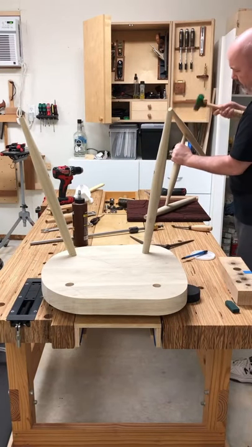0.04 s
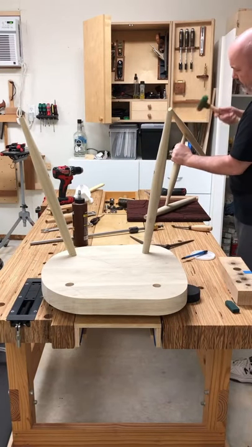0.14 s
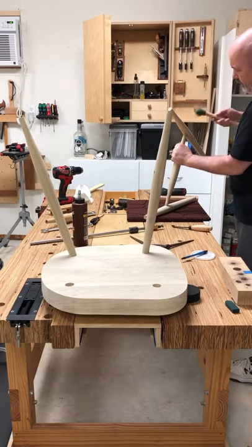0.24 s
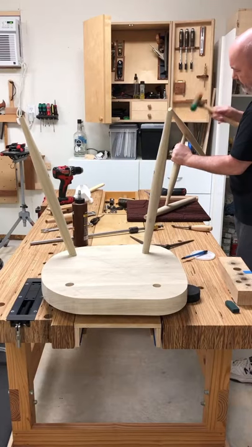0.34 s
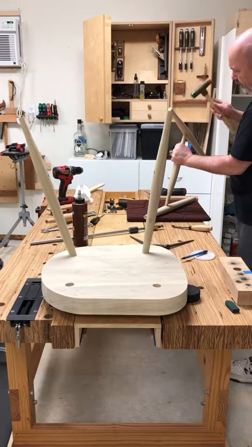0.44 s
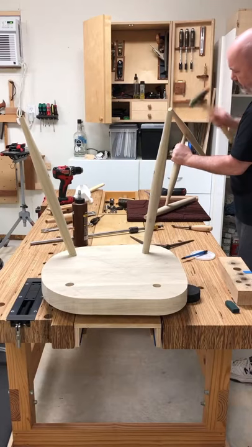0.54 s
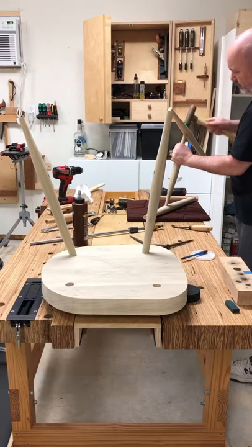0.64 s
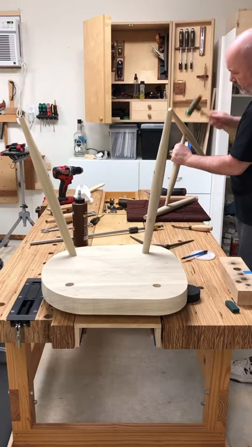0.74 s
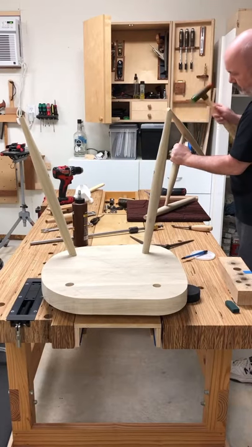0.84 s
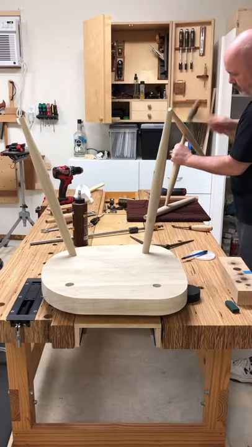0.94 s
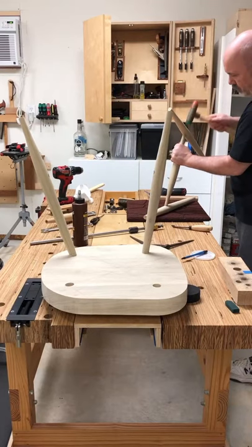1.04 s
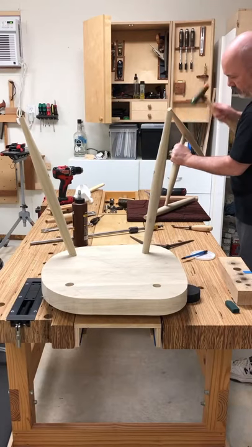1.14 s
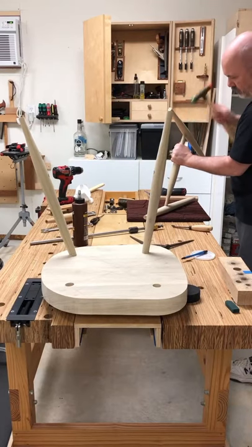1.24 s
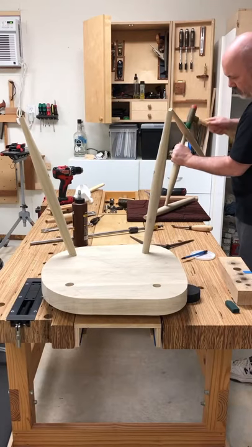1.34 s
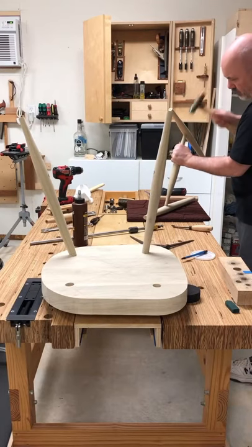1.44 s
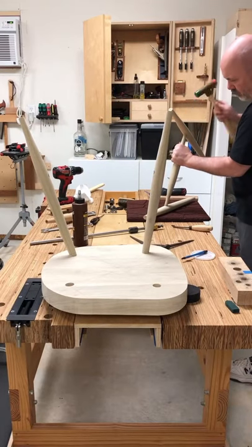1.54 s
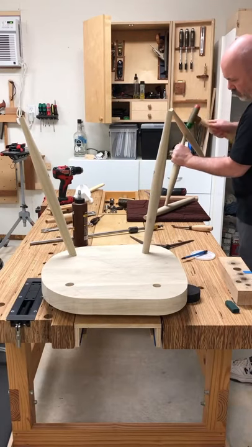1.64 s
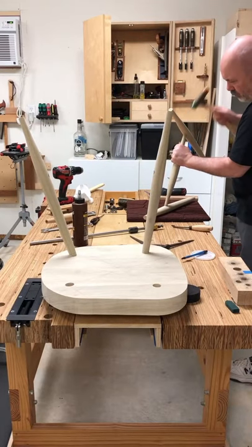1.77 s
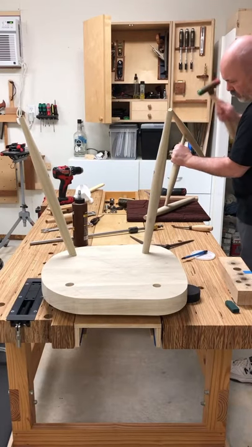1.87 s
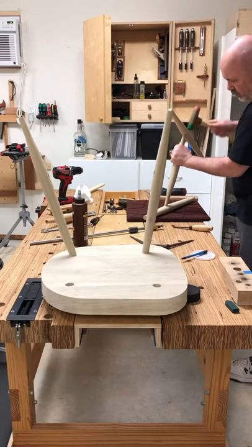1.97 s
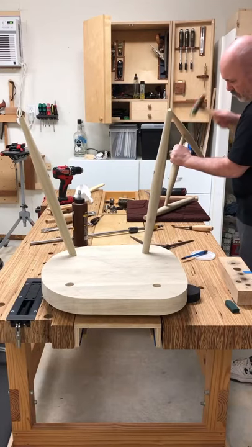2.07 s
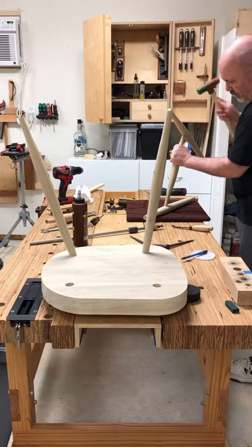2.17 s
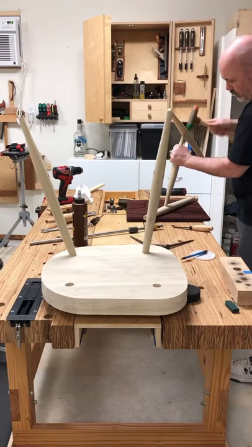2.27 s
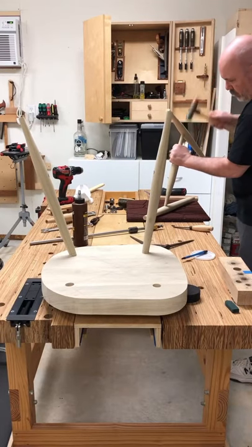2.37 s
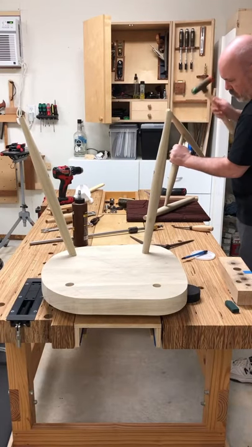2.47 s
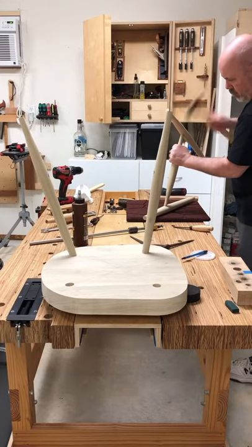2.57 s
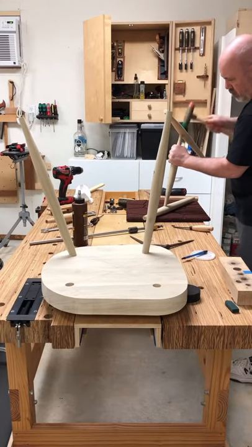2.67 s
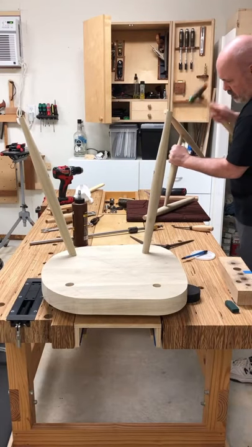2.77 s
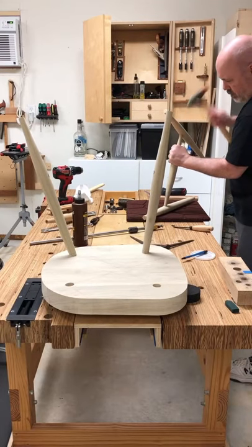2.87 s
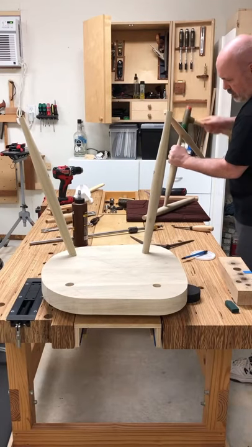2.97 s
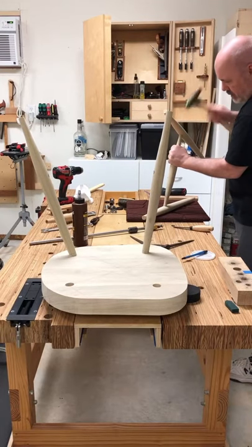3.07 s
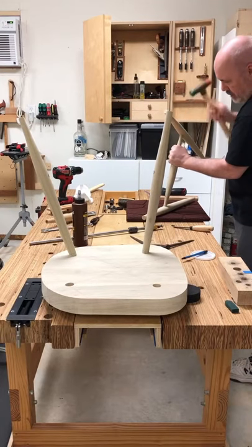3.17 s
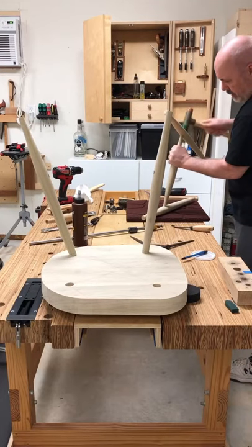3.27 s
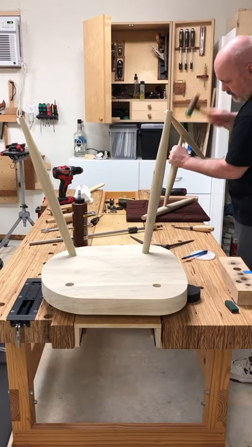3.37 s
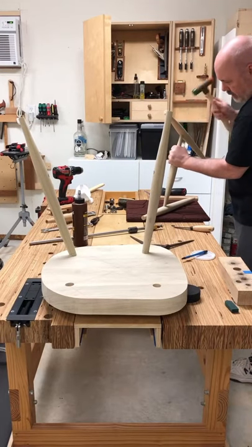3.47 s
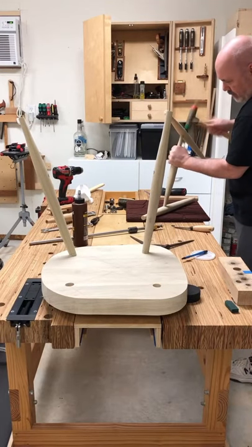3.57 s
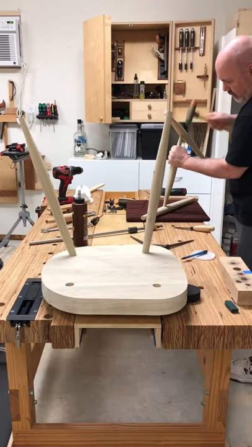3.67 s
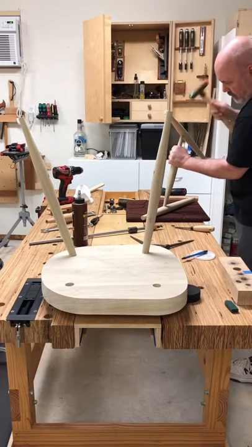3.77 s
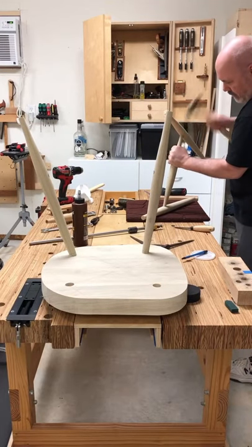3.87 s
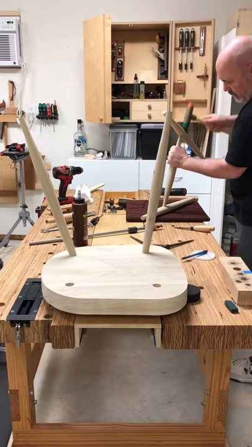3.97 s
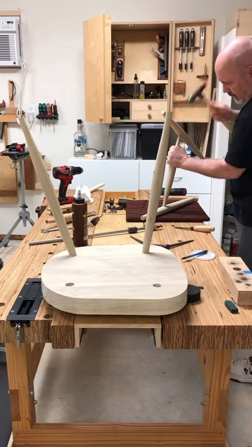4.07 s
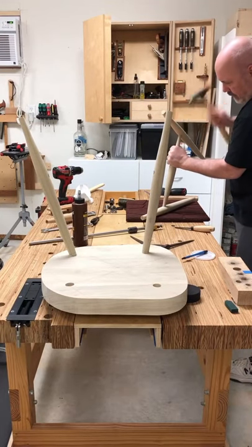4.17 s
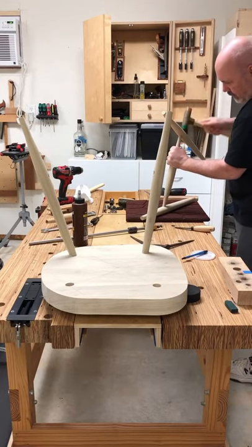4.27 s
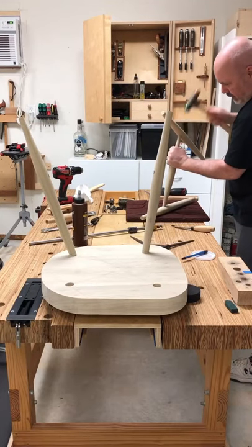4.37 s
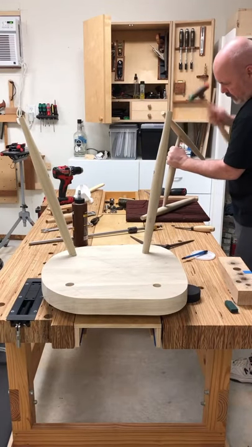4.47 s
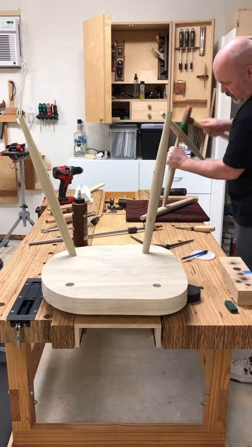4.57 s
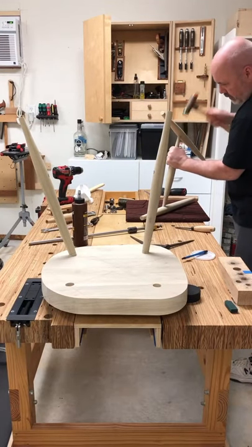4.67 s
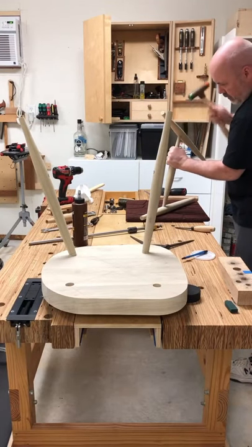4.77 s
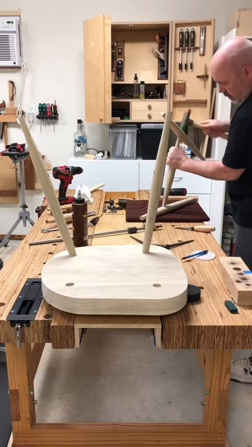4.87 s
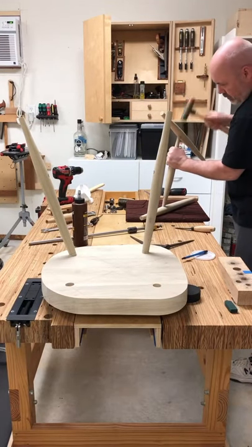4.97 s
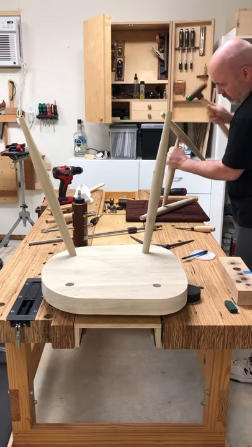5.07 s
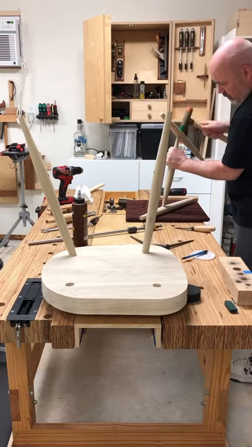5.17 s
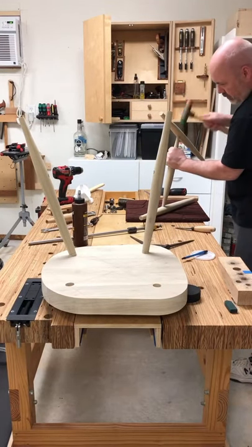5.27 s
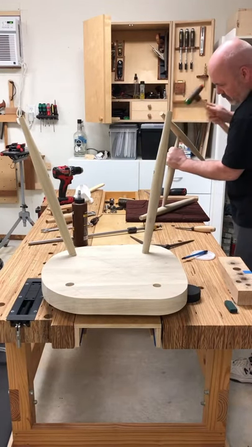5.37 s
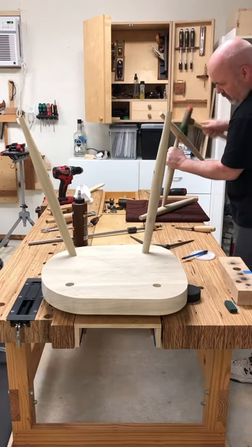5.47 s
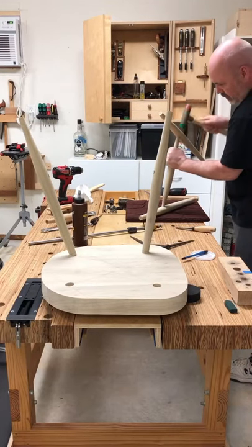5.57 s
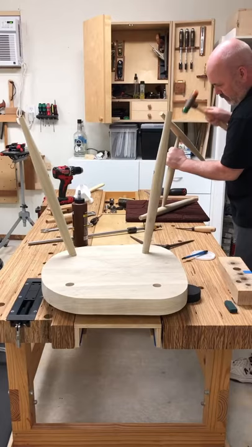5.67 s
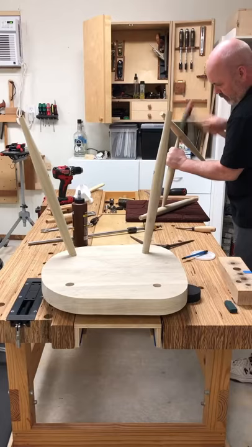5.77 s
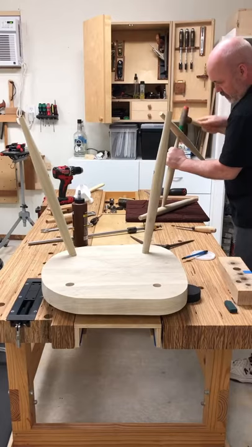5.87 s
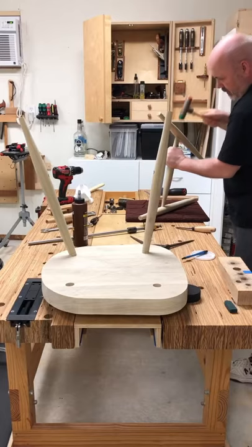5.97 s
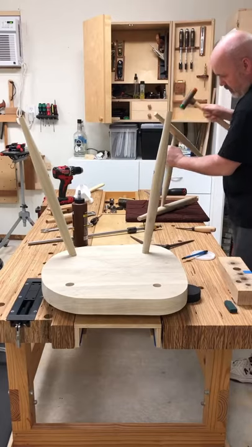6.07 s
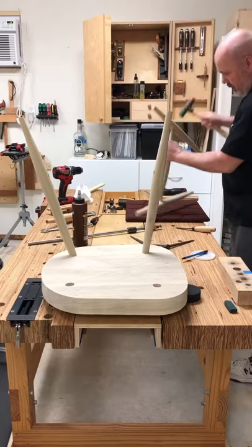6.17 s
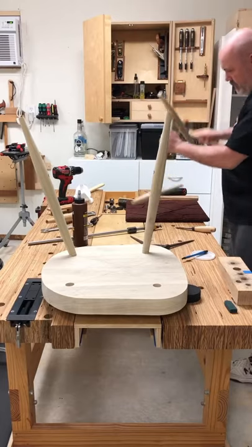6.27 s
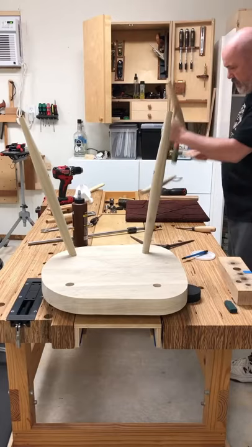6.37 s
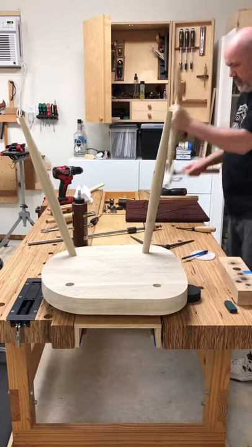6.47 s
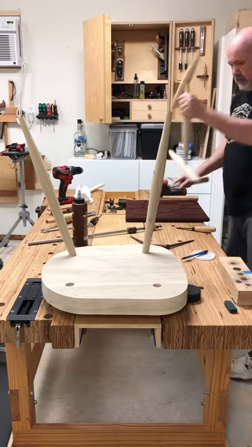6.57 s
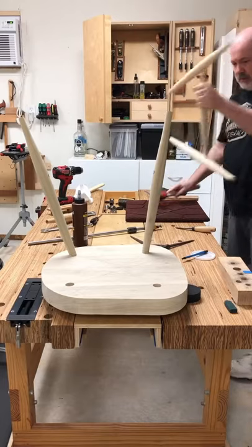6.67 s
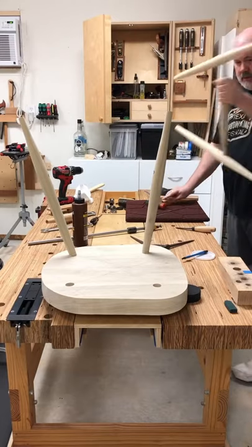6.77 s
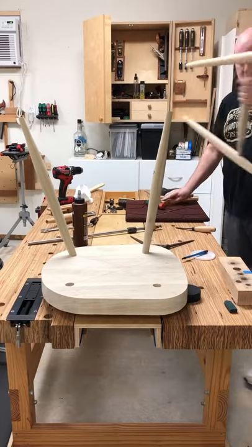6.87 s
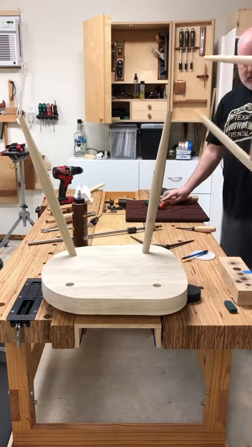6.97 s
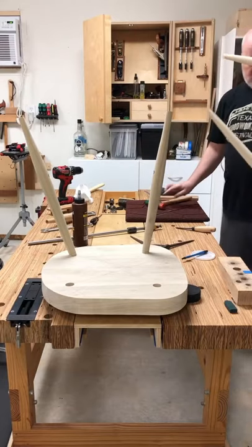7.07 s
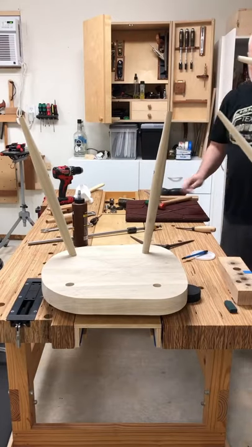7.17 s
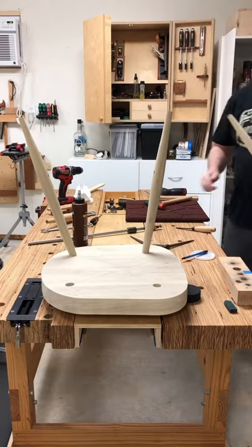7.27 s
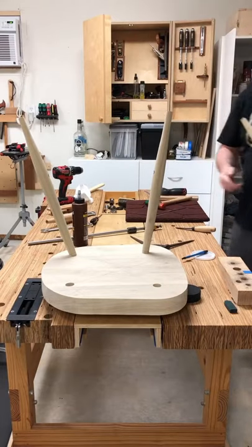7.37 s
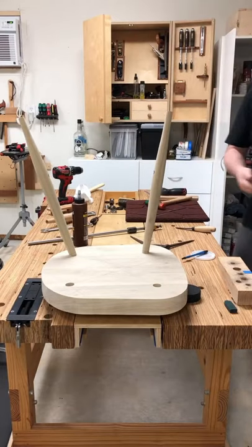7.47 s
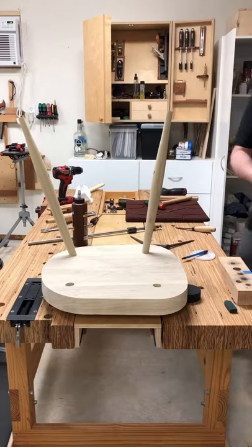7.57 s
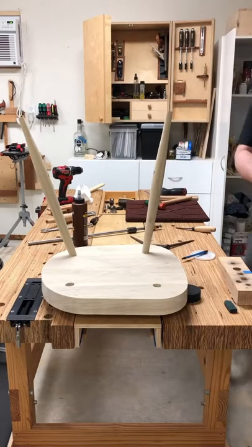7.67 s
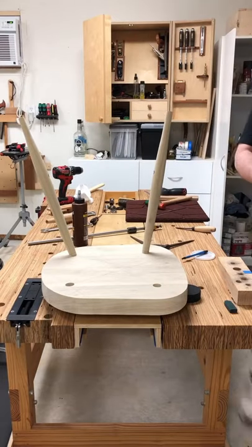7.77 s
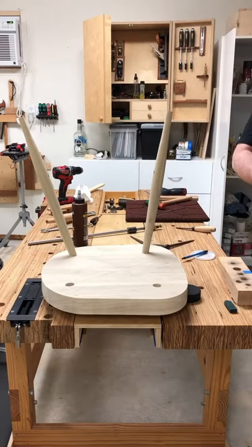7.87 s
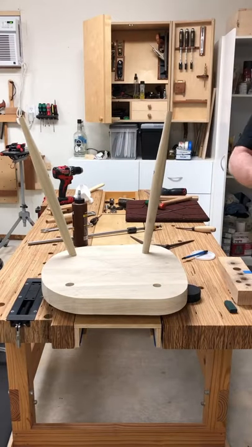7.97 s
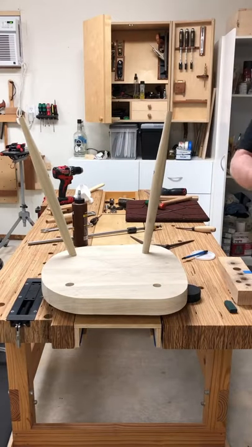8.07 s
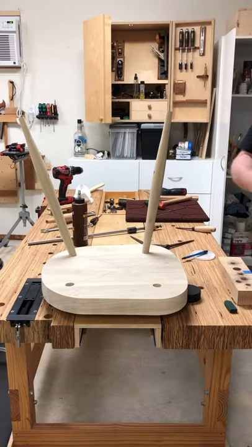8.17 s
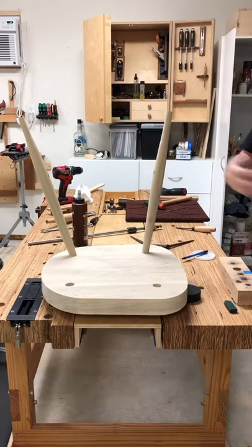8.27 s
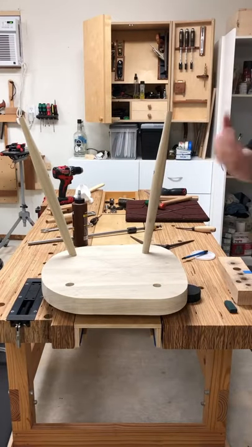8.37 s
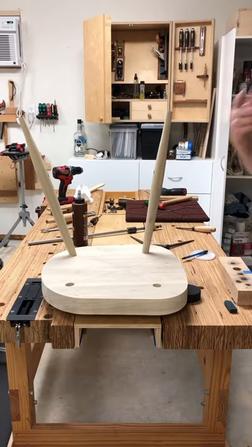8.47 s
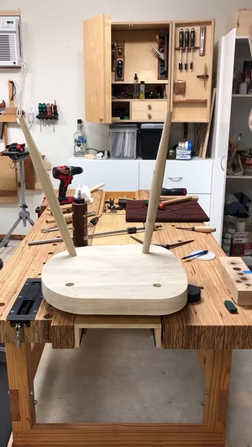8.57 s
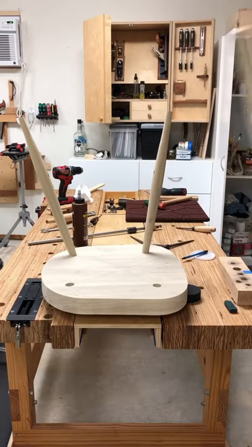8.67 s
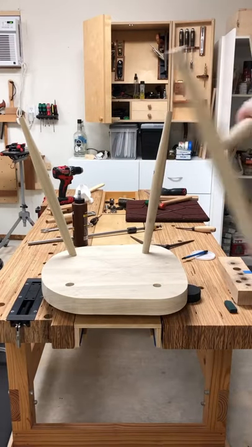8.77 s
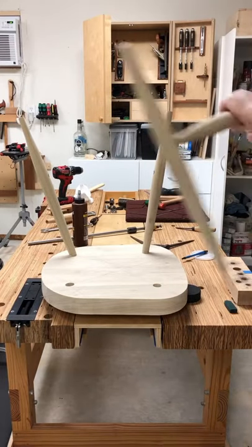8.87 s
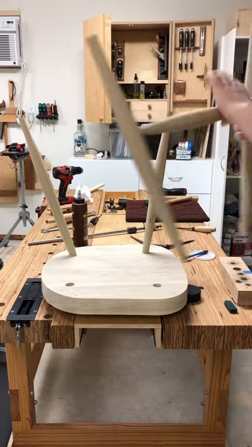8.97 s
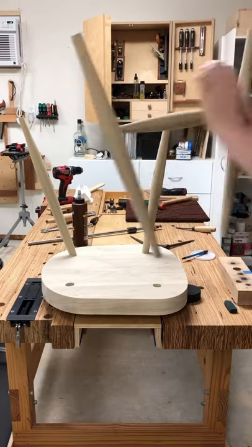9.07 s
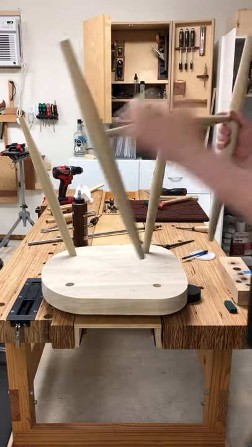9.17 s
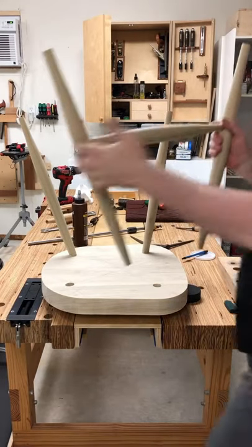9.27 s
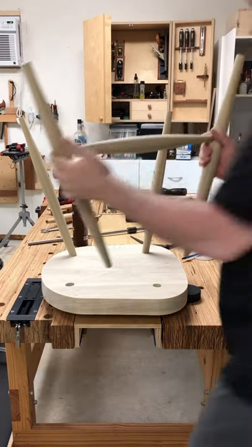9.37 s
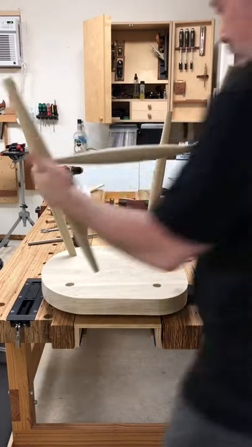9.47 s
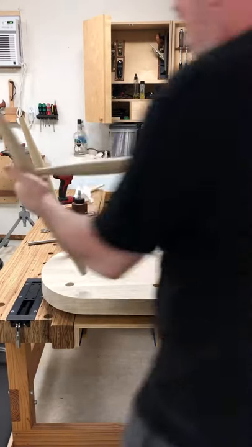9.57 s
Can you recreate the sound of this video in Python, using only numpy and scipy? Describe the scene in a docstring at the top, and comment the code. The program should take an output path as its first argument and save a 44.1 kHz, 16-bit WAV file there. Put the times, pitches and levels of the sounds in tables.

```python
"""An air conditioner hums; then a soft mallet drives a stretcher into the leg of an upside-down wooden chair.
Each blow slaps, rings the chair and booms through the bench: noise bursts, decaying sines and heavy swings.
The joint buzzes in the rebound and loose steel tools jump, as scattered touches set off clicks and ringing.
Then the worker steps away and brings the next frame over: a thump, wooden bumps and grainy noise slides.
Noise tails that die at a different speed in each octave give the reverberation of the small shop."""
import sys
import numpy as np
from scipy import signal
from scipy.fft import rfft, irfft, next_fast_len
from scipy.io import wavfile
from scipy.ndimage import uniform_filter1d

SR = 44100
rng = np.random.default_rng(int(sys.argv[2]) if len(sys.argv) > 2 else 0)


def dump(signal):
    """Clip the signal to [-1, 1] and save it as 16-bit WAV at the path in sys.argv[1]."""
    limited = np.clip(np.atleast_2d(signal).T, -1, 1)
    pcm = np.round(limited * 32767).astype(np.int16)
    wavfile.write(sys.argv[1], SR, pcm)


N = 425124
AGE = np.arange(int(0.8 * SR)) / SR  # seconds since the start of one short sound

# mallet blows: start_s [s], force_db [dB re a usual blow], hardness_db of the contact [dB],
# buzz_db of the joint in the rebound [dB]
BLOWS = [(0.6767, -2, -7, -8), (1.0334, -0.37, -11.5, 2.5), (1.3769, -1, -1, -13), (1.704, 0, 3.5, 4),
         (2.0257, 0, -1.5, -6), (2.3479, -0.5, -1.5, 7), (2.6703, -3.2, 6.5, -4), (2.9957, 0, 5, -7),
         (3.3229, 1.1, 2.5, 10.5), (3.6561, 0.8, -2, 9), (3.9729, 1.1, 0, -8), (4.2996, -0.66, 5, -3),
         (4.6122, 0.5, -1.5, 5), (4.924, -0.3, 3, 0), (5.2393, 0.56, 1.5, -4), (5.551, 0.14, -4, 5),
         (5.864, 0.3, -2.5, 2.5)]


def from_db(db):
    """Decibels to amplitude gain."""
    return 10 ** (np.asarray(db) / 20)


def rms_one(x):
    """Scale to rms 1."""
    return x / np.sqrt(np.mean(x ** 2) + 1e-20)


def at_hz(points, hz):
    """Read a (Hz, value) table on a log-frequency axis."""
    table = np.array(points)
    return np.interp(np.log(np.maximum(hz, 1)), np.log(table[:, 0]), table[:, 1])


def add(track, start_s, sound):
    """Mix a sound into a track at a time."""
    start = int(round(start_s * SR))
    track[start:start + len(sound)] += sound[:N - start]


def fade(t60):
    """Exponential decay that falls 60 dB in t60 seconds."""
    return from_db(-60 * AGE / t60)


def build_up(time_s):
    """Exponential approach to 1, as energy spreads through a body or room."""
    return 1 - np.exp(-AGE / time_s)


def swell(peak_s):
    """A soft rise and fall, height 1."""
    return (AGE / peak_s * np.exp(1 - AGE / peak_s)) ** 2


def high_pass(x, order, hz):
    """Causal low cut."""
    return signal.sosfilt(signal.butter(order, hz, "high", fs=SR, output="sos"), x)


def band(x, low_hz, high_hz):
    """Causal band-pass."""
    edges = [low_hz, min(high_hz, 0.45 * SR)]
    return signal.sosfilt(signal.butter(2, edges, "band", fs=SR, output="sos"), x)


def hiss(low_hz, high_hz):
    """A short stretch of band noise, rms 1."""
    return rms_one(band(rng.standard_normal(len(AGE)), low_hz, high_hz))


def coloured(spectrum, size):
    """Random-phase noise with a given spectrum, rms 1."""
    gain = from_db(at_hz(spectrum, np.fft.rfftfreq(size, 1 / SR)))
    phase = 2 * np.pi * rng.random(len(gain))
    return rms_one(irfft(gain * np.exp(1j * phase), size))


def grainy(depth_db):
    """Millisecond flutter of a rough contact, rms 1."""
    flutter = rms_one(uniform_filter1d(rng.standard_normal(len(AGE)), size=40))
    return rms_one(from_db(depth_db * flutter))


def ringing(modes, detune=0.0, uneven_db=0.0):
    """Decaying sines of a struck body; pitch and strength differ a little from touch to touch."""
    out = np.zeros(len(AGE))
    for pitch_hz, level_db, t60 in modes:
        strength_chance, pitch_chance = rng.standard_normal(2)
        level = from_db(level_db + uneven_db * strength_chance)
        hz = pitch_hz * (1 + detune * pitch_chance)
        out += level * fade(t60) * np.sin(2 * np.pi * hz * AGE)
    return out


def die_away(noise):
    """Each octave of a diffuse sound dies with the shop's reverberation time."""
    # reverberation of the shop: pitch_hz [Hz], t60 [s]
    shop_t60 = [(100, 0.39), (260, 0.8), (700, 0.68), (1840, 0.77), (4850, 0.66), (8000, 0.46),
                (13000, 0.29)]
    spectrum, hz = rfft(noise), np.fft.rfftfreq(len(AGE), 1 / SR)
    centres_hz = 110 * 2.0 ** np.arange(8)
    out = np.zeros(len(AGE))
    for centre_hz, row in zip(centres_hz, np.eye(len(centres_hz))):
        share = np.interp(hz, centres_hz, row)  # overlapping triangles
        out += irfft(spectrum * share, len(AGE)) * fade(at_hz(shop_t60, centre_hz))
    return out


def shop(x, wet_db):
    """Direct sound plus the diffuse return of walls and cabinets."""
    tail = die_away(rng.standard_normal(len(AGE))) * build_up(0.018)
    tail = tail / np.linalg.norm(tail)
    return x + from_db(wet_db) * signal.oaconvolve(x, tail)[:N]


def landings(per_s, flight_s=0.012, settle_s=0.038, uneven_db=8.0):
    """Parts set moving by a blow land after a short flight and chatter until they settle; energy 1."""
    since = AGE - flight_s
    settling = (since > 0) * np.exp(-(since / settle_s) ** 2)
    strength = settling * from_db(uneven_db * rng.standard_normal(len(AGE)))
    touches = (rng.random(len(AGE)) < per_s / SR) * strength
    return touches / (np.linalg.norm(touches) + 1e-9)


def rattle(touches, touch_t60, spectrum):
    """Each touch gives a very short noise burst; the energies of overlapping bursts add up."""
    energy = signal.fftconvolve(touches ** 2, fade(touch_t60) ** 2)[:len(AGE)]
    return np.sqrt(np.abs(energy)) * coloured(spectrum, len(AGE))


def chatter(modes, per_s, flight_s=0.012):
    """Each landing strikes every steel mode again; a mode's total energy stays that of one strike."""
    out = np.zeros(len(AGE))
    touches = landings(per_s, flight_s)
    for mode in modes:
        one = ringing([mode], detune=0.00202, uneven_db=4.5)
        many = signal.fftconvolve(touches, one)[:len(AGE)]
        out += many * np.linalg.norm(one) / (np.linalg.norm(many) + 1e-9)
    return out


def push(force_db, hardness_db):
    """Thud level in dB re a usual blow: a hard, square contact drives more of the blow into the chair."""
    thud_per_hardness = 0.15  # dB per dB
    return force_db + thud_per_hardness * hardness_db


def air_conditioner():
    """Motor lines, slightly unsteady in pitch and level, over the rush of the fan."""
    # motor lines: pitch_hz [Hz], level_db [dB rms]
    motor_lines = [(58.6, -45.5), (118.5, -52.5), (172.8, -47.5), (241.3, -43.5), (479, -55.5)]
    # colour of the air noise: pitch_hz [Hz], level_db [relative dB per Hz]
    air_colour = [(18, -28.5), (30, -21.5), (59, -6.5), (124, -15.5), (239, -4), (336, -8), (473, -12),
                  (540, -12.5), (632, -10.5), (780, -14.5), (962, -13.5), (1860, -19), (8740, -42.5),
                  (14800, -47.5), (16000, -51)]
    air_db, waver, wander_hz = -43.5, 0.11, 0.69  # dB rms, share of level, Hz
    t = np.arange(N) / SR
    knots = np.arange(0, N / SR + 1, 1 / 8)  # a new random target every eighth of a second
    out = from_db(air_db) * coloured(air_colour, next_fast_len(N))[:N]
    for pitch_hz, level_db in motor_lines:
        sway = np.interp(t, knots, rng.standard_normal(len(knots)))
        drift = np.interp(t, knots, rng.standard_normal(len(knots)))
        phase = 2 * np.pi * np.cumsum(pitch_hz + wander_hz * drift) / SR
        out += np.sqrt(2) * from_db(level_db) * (1 + waver * sway) * np.sin(phase)
    return out


def mallet(thud_db=-10.0, clack_db=-9.5, crack_db=-14.0, slap_echo_db=-11.0):
    """The face slaps the leg; then the push spreads through seat and bench, and the room fills."""
    # chair and bench: pitch_hz [Hz], level_db [relative dB], t60 [s]
    wood_modes = [(121.4, -7.5, 0.36), (129.8, -6, 0.19), (174.2, -8.5, 0.26), (201, -7, 0.26),
                  (221.5, 2.5, 0.2), (266.4, -7.5, 0.21), (282.6, 2.5, 0.39), (292.3, 4.5, 0.12),
                  (337.4, -6.5, 0.38), (350.6, -7.5, 0.42), (372.4, -12, 0.4), (447, -15.5, 0.64),
                  (471.4, -7.5, 0.56), (492.2, -3.5, 0.61), (506, -3, 0.4), (548, -6.5, 0.21),
                  (598.4, -5.5, 0.17), (769, -16.5, 1), (803, -13, 0.21), (834, -12, 0.58),
                  (1090, -38, 0.69), (1155, -17.5, 0.87), (1260, -25, 0.92), (1472, -16.5, 0.65),
                  (1905, -22, 0.87), (1860, -22, 0.92)]
    # dense upper resonances of the wood, as the shop returns them: pitch_hz [Hz], level_db [relative dB per Hz]
    clack_colour = [(70, 1), (110, -2), (200, 6.5), (400, 4), (520, 3.5), (800, 4), (1300, -0.5),
                    (1950, -6), (2500, -11.5), (4000, -17), (6500, -23), (10000, -27), (16000, -35)]
    give_s = 0.001005  # the wood answers this long after the slap
    spread_s, build_s = 0.0043, 0.0097  # build-up of body and dense ringing at a firm blow
    firm_db, lag = 2.5, 0.66  # crack of a firm blow [dB]; slowing [dB per dB below firm]
    alike = 0.34  # share of the dense ringing's power that repeats
    wood, slaps = np.zeros(N), np.zeros(N)
    same_path = coloured(clack_colour, len(AGE))
    for start_s, force_db, hardness_db, _ in BLOWS:
        crack = force_db + hardness_db
        slowness = from_db(lag * (firm_db - crack))  # a gentle blow builds up more slowly than a firm one
        body = -ringing(wood_modes, detune=0.00433, uneven_db=1.0) * build_up(spread_s * slowness)
        # the joint shifts with every blow, so only part of the dense ringing repeats
        new_path = coloured(clack_colour, len(AGE))
        dense = np.sqrt(alike) * same_path + np.sqrt(1 - alike) * new_path
        dense = die_away(dense) * np.sqrt(build_up(build_s * slowness))
        thud = from_db(push(force_db, hardness_db) + thud_db) * body
        add(wood, start_s + give_s, thud + from_db(force_db + clack_db) * dense)

        direct = fade(0.011) * build_up(0.00089)
        echo = from_db(slap_echo_db) * fade(0.14) * build_up(0.013)
        slap_noise = hiss(3260, 8100) + 0.26 * hiss(9300, 16000)
        add(slaps, start_s, from_db(crack + crack_db) * (direct + echo) * slap_noise)
    # the bench is too small to radiate deep bass
    return high_pass(wood, 4, 97) + slaps


def leg_swing(swing_db=-7.0, bench_db=-16.0):
    """The struck leg and the bench under it heave for a few heavy cycles, damped by the gripping hand."""
    out = np.zeros(N)
    leg = swell(0.0084) * np.sin(2 * np.pi * 255 * AGE)
    bench = from_db(bench_db) * swell(0.013) * np.sin(2 * np.pi * 140 * AGE)  # bench_db is re the leg
    for start_s, force_db, hardness_db, _ in BLOWS:
        level = from_db(push(force_db, hardness_db) + swing_db)
        add(out, start_s + 0.00098, -level * (leg + bench))
    return out


def tools(clatter_db=-12.0, steel_db=-28.5, blade_db=-28.5):
    """Chisels and bits rattle on the bench with clicks and ringing steel; one blade works loose."""
    # loose steel tools on the bench: pitch_hz [Hz], level_db [relative dB], t60 [s]
    tool_modes = [(4450, -2, 0.09), (4960, -3.5, 0.052), (5480, -6, 0.075), (8150, 1, 0.037),
                  (9270, -10.5, 0.38), (9330, -5, 0.074), (9480, -4, 0.11), (9950, 0, 0.1),
                  (10570, -3, .06), (12080, -1, 0.12), (12250, -6, 0.19), (12700, 1, .04),
                  (12900, -12, .04), (15000, -2, 0.12)]
    # one thin blade that rings out: pitch_hz [Hz], level_db [relative dB], t60 [s]
    blade_modes = [(6530, -12.5, 0.45), (7820, -3, 0.21), (7790, -2.5, 0.074), (8050, -14, .04),
                   (12800, -4, 0.12)]
    # colour of the clicks: pitch_hz [Hz], level_db [relative dB per Hz]
    clatter_colour = [(500, -22.5), (1200, 7), (3000, 11.5), (6500, 8.5), (9500, 8.5), (11300, 5),
                      (12600, 7), (14000, 2), (16000, -5.5)]
    # late touches of steel on steel: start_s [s], pitch_hz [Hz], level_db [dB], t60 [s]
    pings = [(2.679, 5330, -32, 0.3), (3.812, 6530, -30, 0.21), (5.988, 5950, -38.5, 0.32),
             (5.988, 9040, -34, 0.23)]
    jump_per_force = 3.2  # dB per dB: loose tools jump much higher as the force grows
    blade_per_buzz = 0.55  # dB per dB: the rebound of the joint shakes the blade too
    wedged_db, loose_by_s = 11, 3.3  # the blade starts wedged, this much quieter, and is loose by then
    clicks, steel = np.zeros(N), np.zeros(N)
    for start_s, force_db, _, buzz_db in BLOWS:
        jump = jump_per_force * force_db
        wedged = wedged_db * max(0, 1 - start_s / loose_by_s)
        blade = force_db + blade_per_buzz * buzz_db - wedged
        add(clicks, start_s, from_db(jump + clatter_db) * rattle(landings(900), 0.0039, clatter_colour))
        add(steel, start_s, from_db(jump + steel_db) * chatter(tool_modes, 540))
        add(steel, start_s, from_db(blade + blade_db) * chatter(blade_modes, 500))
    for start_s, pitch_hz, level_db, t60 in pings:
        add(steel, start_s, chatter([(pitch_hz, level_db, t60)], 400, flight_s=0.0))
    return shop(clicks, wet_db=3.5) + shop(steel, wet_db=-10.0)


def joint_buzz(buzz_level_db=-15.0, knock_t60=0.032):
    """Wood chatters on wood as the chair rebounds; now and then the loose joint knocks hard and rasps."""
    # colour of wood knocking on wood: pitch_hz [Hz], level_db [relative dB per Hz]
    rebound_colour = [(250, -15), (700, -3.5), (1400, 5.5), (2100, -0.5), (3100, -3), (4400, -6.5),
                      (7000, -25), (16000, -40)]
    # the loudest rebounds, where the joint knocks a second time: start_s [s], level_db [dB], rasp_db [dB]
    second_knocks = [(0.704, -16, -20), (0.748, -25, -47), (1.062, -14.5, -36), (2.062, -24, -30),
                     (3.029, -19, -36), (5.274, -21, -33), (5.592, -17.5, -25)]
    out = np.zeros(N)
    for start_s, _, _, buzz_db in BLOWS:
        touches = landings(per_s=260, flight_s=0.021, settle_s=0.032, uneven_db=2.5)
        add(out, start_s, from_db(buzz_db + buzz_level_db) * rattle(touches, 0.0078, rebound_colour))
    for start_s, level_db, rasp_db in second_knocks:
        knock = from_db(level_db) * coloured(rebound_colour, len(AGE))
        rasp = from_db(rasp_db) * hiss(2950, 3070)
        add(out, start_s, (knock + rasp) * fade(knock_t60))
    return shop(out, wet_db=0.5)


def handling():
    """A thump on the bench, light ringing bumps of the frame, and brief grainy slides of filtered noise."""
    # colour of the soft thump: pitch_hz [Hz], level_db [relative dB per Hz]
    thump_colour = [(60, -24), (122, 10), (170, -1), (300, -8), (520, -8), (1200, -16.5), (2500, -35),
                    (8000, -68)]
    # the frame bumps in the hands: start_s [s], level_db [dB]
    frame_bumps = [(8.965, -34), (9.172, -31), (9.518, -47)]
    # ring of the frame: pitch_hz [Hz], level_db [relative dB], t60 [s]
    frame_modes = [(330, -8, 0.06), (537, -8, 0.05), (620, 2, 0.032), (736, 5, 0.022), (900, -7, 0.033),
                   (1190, -6, 0.037), (1350, -17, .04)]
    # shoe scuff and hands sliding on wood: middle_s [s], level_db [dB], half_length_s [s], pitch_hz [Hz]
    slides = [(7.991, -49.5, 0.026, 9000), (7.997, -41, 0.017, 2900), (8.562, -50.5, 0.017, 8000),
              (8.704, -58, 0.044, 9000), (8.77, -53, 0.011, 9000), (8.987, -46, .012, 7500),
              (9.16, -47.5, 0.0097, 8500), (9.542, -44.5, 0.012, 6950)]
    thump_s, thump_db = 6.846, -29.5  # as the worker steps away
    out = np.zeros(N)
    add(out, thump_s, from_db(thump_db) * swell(0.015) * coloured(thump_colour, len(AGE)))
    for start_s, level_db in frame_bumps:
        add(out, start_s, from_db(level_db) * ringing(frame_modes, detune=0.01, uneven_db=4.5))
    for middle_s, level_db, half_length_s, pitch_hz in slides:
        stroke = np.exp(-0.5 * (AGE / half_length_s - np.pi) ** 2)  # bell shape, pi half lengths in
        noise = grainy(2.8) * hiss(pitch_hz / 6.6, pitch_hz * 1.23)
        add(out, middle_s - np.pi * half_length_s, from_db(level_db) * stroke * noise)
    return shop(out, wet_db=-5.5)


def scene():
    """Everything reaches one microphone at the end of the bench."""
    blows = mallet() + leg_swing() + tools() + joint_buzz()
    return (air_conditioner() + blows + handling())[None]


def record(dry):
    """The microphone sheds rumble; the tallest peaks are rounded off at full scale; the top is cut."""
    heard = high_pass(dry, 4, 44)
    rounded = heard / (1 + heard ** 8) ** (1 / 8)
    cutoff_hz = 15900
    return signal.sosfilt(signal.ellip(10, 0.2, 70, cutoff_hz, fs=SR, output="sos"), rounded)


dry = scene()
out = record(dry)
dump(out)
```